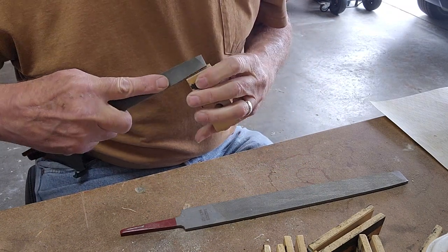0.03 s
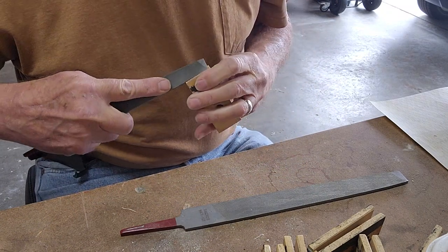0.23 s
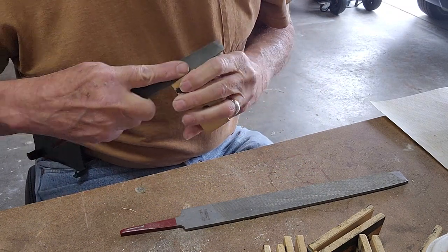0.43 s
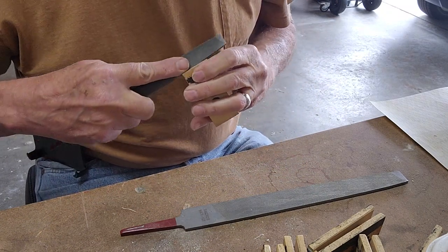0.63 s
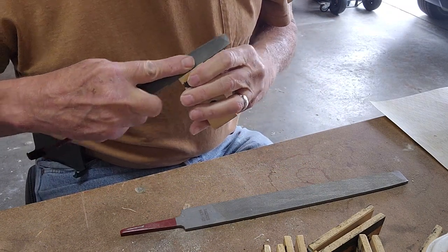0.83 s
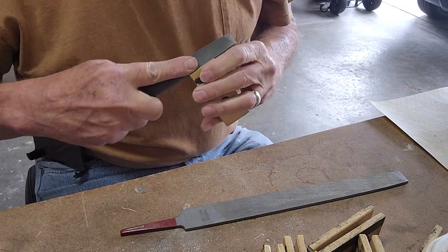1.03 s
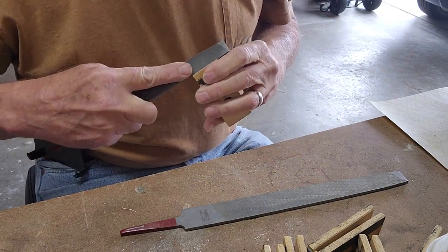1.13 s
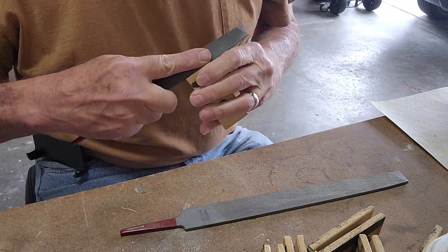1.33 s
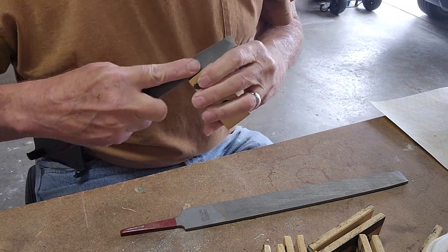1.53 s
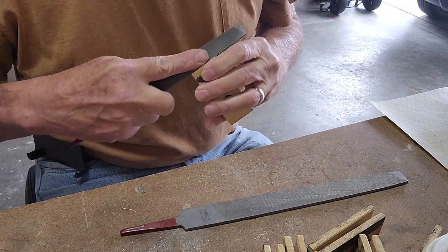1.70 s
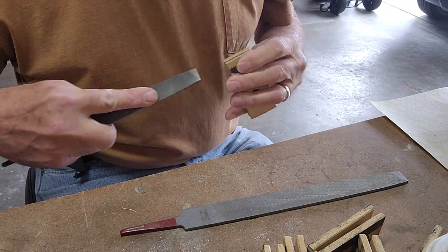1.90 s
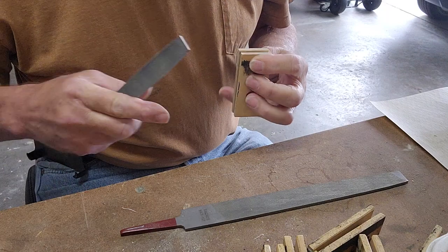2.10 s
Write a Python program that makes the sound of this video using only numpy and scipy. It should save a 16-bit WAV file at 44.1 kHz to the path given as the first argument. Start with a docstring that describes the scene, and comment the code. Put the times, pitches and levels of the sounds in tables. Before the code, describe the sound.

Close-miked hand filing on wood: a faint brush, then short gritty scrapes in steady rhythm, a brighter metallic final stroke, then a soft tap and quiet; low room rumble and slight workshop reflections, slightly left of centre.

```python
"""A flat steel file takes old glue off a small hand-held wooden block: a light touch, eight quick strokes, a faint brush.
Stroke speed drives level and tooth rate: fibres tear (random snaps), teeth tick, block and blade ring (resonances).
The blade rings hardest in the last full stroke. Pushes thud softly (low noise); damped noise bursts make taps.
Hands bump dully (short low cycles). Close, left of centre, in a workshop with low rumble and air (shaped noise)."""
import sys
import numpy as np
from scipy import signal
from scipy.fft import rfft, irfft
from scipy.io import wavfile
from scipy.ndimage import uniform_filter1d, map_coordinates

SR = 44100
rng = np.random.default_rng(int(sys.argv[2]) if len(sys.argv) > 2 else 0)


def inscribe(sig):
    """Save sig as 16-bit PCM at rate SR to the path in sys.argv[1].

    A 1-D sig is mono; a 2-D sig holds one channel per row.
    Samples are clipped to [-1, 1] before scaling.
    """
    pcm = np.round(np.clip(np.atleast_2d(sig).T, -1, 1) * 32767)
    wavfile.write(sys.argv[1], SR, pcm.astype(np.int16))


N = 95079

# Workshop rumble spectrum: (frequency [Hz], relative level per Hz [dB])
RUMBLE_SPECTRUM = [(24, -13), (33, -17), (44, -2.5), (55, 4), (70, -4.5), (100, -1.5), (125, -16.5),
                   (175, -15.5), (240, -39), (400, -66)]
# Workshop air noise spectrum: (frequency [Hz], relative level per Hz [dB])
AIR_SPECTRUM = [(100, -8), (260, -4), (390, 5.5), (600, -3.5), (1200, -7.5), (3000, -13.5), (7500, -15),
                (9500, -41), (15000, -24)]
# Dull bumps of the hands as the file turns round:
# (centre time [s], peak level [dB], frequency [Hz], half-length to 1/e [s])
HAND_BUMPS = [(0.227, -36, 60, 0.0074), (0.483, -39.5, 85, 0.016), (0.689, -34, 78, 0.014),
              (1.345, -31, 50, 0.021), (1.64, -35, 48, 0.044), (1.862, -35, 85, 0.016)]
# Taps of file and fingers on the block, band-passed twice:
# (start [s], peak level [dB], centre [Hz], width per pass [Hz], burst decay T60 [s])
BLOCK_TAPS = [(0.033, -47, 6760, 4170, 0.062), (0.052, -44.5, 1050, 575, 0.027),
              (0.055, -46, 3530, 2430, 0.029), (0.13, -45, 656, 910, 0.018), (0.13, -50, 2440, 3080, 0.028),
              (0.499, -62, 13300, 8000, .035), (0.915, -49.5, 1760, 2960, 0.034),
              (1.158, -42.5, 2300, 1380, 0.11), (1.345, -48, 1550, 480, 0.16),
              (1.506, -62, 2400, 2500, 0.041), (1.675, -48, 4840, 6060, 0.15),
              (1.688, -47.5, 1500, 440, .08), (1.825, -35.5, 2480, 1100, 0.054),
              (1.945, -50, 2750, 590, 0.026), (1.949, -51.5, 5560, 2930, 0.026)]
# Tearing fibres: (frequency [Hz], relative level per Hz [dB])
FIBRE_SPECTRUM = [(200, -34), (450, -15), (1100, -15), (2000, 3), (2400, -10), (2850, -9.5), (3300, -10.5),
                  (4300, -4.5), (6000, 6.5), (6700, -7), (7600, 7), (8650, -16.5), (9300, -12),
                  (11000, -14), (12200, -5), (14300, -7.5), (15400, -10)]
# Teeth meeting the edge: (frequency [Hz], relative level per Hz [dB])
TOOTH_SPECTRUM = [(200, -25), (400, 9.5), (530, 9.5), (800, -2.5), (1100, 2.5), (1600, -3.5), (2500, 8),
                  (4000, -10.5), (9000, -34)]
# Push thud: (frequency [Hz], relative level per Hz [dB])
THUD_SPECTRUM = [(30, -58), (60, 8.5), (78, -0.5), (88, 13.5), (105, -3.5), (135, -8.5), (180, -23),
                 (260, -56)]
# Block resonances: (frequency [Hz], width [Hz], mean relative level per Hz [dB])
BLOCK_MODES = [(1076, 134, -6), (1557, 103, -3), (2267, 160, -5), (2506, 75, -3.5), (3189, 160, 3.5),
               (3708, 110, 9), (4302, 145, 6.5), (4600, 390, -7.5), (6980, 150, -3)]
# Blade resonances: (frequency [Hz], width [Hz], mean relative level per Hz [dB])
BLADE_MODES = [(3660, 71, -18), (3850, 130, -10), (4736, 420, 2.5), (4887, 93, 4.5), (5010, 790, -5.5),
               (6120, 125, -3), (6260, 240, -20.5)]
# File strokes: (start [s], length [s], place of top speed [fraction, clipped to 0.1-0.9], swell exponent,
# rasp level [dB], rasp bass gain [dB], rasp treble gain [dB], block ring level [dB], blade ring level [dB],
# tooth tick level [dB], nominal top tooth rate [Hz], thud level [dB], edge resonance [Hz], edge ring level [dB])
FILE_STROKES = [ (0.225, 0.087, 0.79, 1.74, -63, 0, 2, -68, -70, -68.5, 411.3, -59, 2320, -77),
                (0.299, 0.2, 0.63, 1.44, -51, 9.5, 4, -48.5, -58, -57.5, 881, -64, 3220, -57.5),
                (0.548, 0.19, 0.64, 1.55, -54.5, 16, 5.5, -49, -54, -68, 784, -48, 4510, -51),
                (0.752, 0.15, 0.63, 1.35, -47.5, 9.5, 6, -45, -48, -61.5, 598, -45, 2474, -52),
                (0.95, 0.17, 0.57, 2.1, -51, 12, 3, -46.5, -51.5, -68.5, 550, -49.5, 3500, -69),
                (1.143, 0.16, 0.54, 1.17, -53, 15, 13.5, -47, -80, -60, 738, -41.5, 2380, -60.5),
                (1.326, 0.15, .46, 1.6, -46, 8.5, 2, -48.5, -40, -60, 1090, -42.5, 5800, -65),
                (1.488, 0.14, 0.53, 1.08, -48.5, 11.5, 4.5, -55, -84, -53.5, 519, -41, 3525, -52.5),
                (1.656, 0.22, 0.58, 1.54, -40.5, -8.5, 1, -44, -34, -62, 818, -41.5, 4180, -42.5),
                (2.014, 0.069, 1, 1.5, -75, -3, 4, -107, -100, -106, 390, -75, 7300, -72.5)]
# Ear level difference: (frequency [Hz], left minus right [dB])
EAR_LEVEL = [(700, 5.5), (2400, 1), (4400, -1), (6300, 1), (8100, 5), (10000, 10), (12200, 4.5),
             (14500, 10)]
# Ear phase difference: (frequency [Hz], left lead over right [rad])
EAR_PHASE = [(100, 0.033), (1640, 0.93), (3500, 1.38), (4100, 2.6), (4820, 4.92), (5430, 1.4), (6290, 5.1),
             (8100, 4.11), (11100, 7), (14300, 8.4)]
# Reflection from the blade ends: (frequency [Hz], share reflected [0-1])
BLADE_END_REFLECTION = [(1200, 0), (2600, 1)]

RUMBLE_DB, RUMBLE_SIDE_DB = -47, -19.5  # side relative to mid
AIR_DB, AIR_SIDE_DB = -70, -4
AROUND_LEFT_DB = 1.54  # left minus right
GRAINS_PER_S, GRAIN_SPREAD_DB = 9000, 2.5
CATCH_DB, CATCH_PER_S = 1.38, 43  # uneven bite
MODE_WANDER_MAX_DB, BLADE_WANDER_MAX_DB, MODE_WANDER_PER_S = 5, 2.5, 40
TOOTH_JITTER, TOOTH_JITTER_PER_S, TOOTH_DEPTH = .018, 330, 0.38
TOOTH_SPEED_POWER, BLADE_POWER, THUD_POWER = .65, 2.2, 0.4
EDGE_Q, SPREAD_DB = 16, -7
CONTACT_DB, CONTACT_T60_S = -4, .012
NEAR_DB, NEAR_T60_S = -1.5, 0.03
ROOM_DB, ROOM_T60_S, ROOM_TOP_HZ = -12.5, 0.25, 8500
BOUNCE_S, BOUNCE_DB = .001225, -10
BOUNCE_DRIFT, BOUNCE_DRIFT_PER_S = .035, 6  # rms fraction of the delay
LOW_CUT_HZ, TOP_HZ, FADE_S = 24, 15400, .006


def undb(db):
    """Decibels to gain."""
    return 10 ** (np.asarray(db) / 20)


def unit(x):
    """Scale to rms 1."""
    return x / np.sqrt(np.mean(x ** 2) + 1e-18)


def noise():
    """White noise."""
    return rng.standard_normal(N)


def walk(rate_per_s):
    """Smoothed noise at rms 1."""
    k = max(int(SR / rate_per_s), 1)
    return unit(uniform_filter1d(uniform_filter1d(noise(), k), k))


def freqs():
    """Bin frequencies [Hz], floored at 1."""
    return np.maximum(np.fft.rfftfreq(N, 1 / SR), 1)


def over_hz(points):
    """Interpolate (Hz, value) points over log frequency."""
    hz, value = np.array(points, float).T
    return np.interp(np.log(freqs()), np.log(np.maximum(hz, 1)), value)


def weigh(x, response):
    """Multiply the spectrum of x by a response."""
    return irfft(rfft(x) * response, N)


def colour(x, points):
    """Apply a (Hz, dB) response, at rms 1."""
    return unit(weigh(x, undb(over_hz(points))))


def ring(x, modes):
    """Parallel (Hz, width Hz, dB) resonances, at rms 1."""
    f = freqs()
    response = sum(undb(db) / (1 + 1j * (f / hz - hz / f) * hz / width) for hz, width, db in modes)
    return unit(weigh(x, response))


def split_ears(left_minus_right_db):
    """Left and right gains, half the difference each."""
    return undb(np.array([[.5], [-.5]]) * left_minus_right_db)


def background(points, db, side_db):
    """Steady workshop noise: shared mid plus opposite-sign side for width."""
    mid = colour(noise(), points)
    side = undb(side_db) * colour(noise(), points) * np.array([[1], [-1]])
    return undb(db) * (mid + side)


def echoes(x, t, t60_s):
    """Diffuse reflections: decaying noise tail, independent per ear."""
    tail = rng.standard_normal((2, SR // 2)) * np.exp(-np.log(1000) * t[:SR // 2] / t60_s)
    tail /= np.sqrt(np.sum(tail ** 2, axis=1, keepdims=True))
    return signal.fftconvolve(x[None], tail, axes=1)[:, :N]


def place(x, scattered, t):
    """Direct sound left of centre, quick reflections off hands and bench, then the duller workshop."""
    lead_rad = np.interp(freqs(), *np.array(EAR_PHASE).T)
    direct = np.array([x, weigh(x, np.exp(-1j * lead_rad))])
    near = direct + scattered + undb(NEAR_DB) * echoes(x, t, NEAR_T60_S)
    near = weigh(near, split_ears(over_hz(EAR_LEVEL)))
    dull = weigh(x, 1 / np.sqrt(1 + (freqs() / ROOM_TOP_HZ) ** 4))
    return near + undb(ROOM_DB) * echoes(dull, t, ROOM_T60_S)


def bounce(x, t):
    """Reflection from the blade ends: a drifting delay cuts shifting notches, mostly in the treble."""
    late_s = t - BOUNCE_S * (1 + BOUNCE_DRIFT * walk(BOUNCE_DRIFT_PER_S))
    reflected = weigh(x, over_hz(BLADE_END_REFLECTION))
    copy = np.array([map_coordinates(row, [late_s * SR], order=3) for row in reflected])
    return (x + undb(BOUNCE_DB) * copy) / np.sqrt(1 + undb(2 * BOUNCE_DB))


def bumps(t):
    """Hand bumps: low cosines of random phase in Gaussian swells."""
    out = np.zeros(N)
    for at, db, hz, half_s in HAND_BUMPS:
        swell = np.exp(-((t - at) / half_s) ** 2)
        out += undb(db) * swell * np.cos(2 * np.pi * (hz * t + rng.random()))
    return out


def taps(t):
    """Knocks: decaying noise bursts through a doubled resonance."""
    out = np.zeros(N)
    for start, db, hz, width, t60_s in BLOCK_TAPS:
        burst = noise() * (t >= start) * np.exp(-np.log(1000) * np.maximum(t - start, 0) / t60_s)
        knock = ring(ring(burst, [(hz, width, 0)]), [(hz, width, 0)])
        out += undb(db) * knock / np.abs(knock).max()
    return out


def fibres():
    """Fibre snaps: random impulses of either sign and unequal size."""
    hits = rng.random(N) < GRAINS_PER_S / SR
    return unit(hits * np.sign(noise()) * undb(GRAIN_SPREAD_DB * noise()))


def restless(modes, wander_max_db):
    """Snaps excite body modes, each level wandering as the contact point moves."""
    out = np.zeros(N)
    for hz, width, db in modes:
        level = undb(db + wander_max_db * np.tanh(walk(MODE_WANDER_PER_S)))
        ringing = ring(ring(fibres(), [(hz, 4 * width, 0)]), [(hz, width, 0)])
        out += level * np.sqrt(width) * ringing
    return unit(out)


def stroke_speed(t, start, length, top):
    """Relative speed: a skewed half-sine, zero outside the stroke."""
    peak = start + length * np.clip(top, .1, .9)
    progress = np.interp(t, [start, peak, start + length], [0, .5, 1])
    return np.abs(np.sin(np.pi * progress))


def tooth_ticks(turns, catch, length):
    """One impulse per tooth passing the edge, coloured; level set over the stroke length."""
    ticks = np.diff(np.floor(turns), prepend=0) * catch
    return colour(ticks, TOOTH_SPECTRUM) * np.sqrt(length * SR / N)


def filing(t):
    """Stroke speed sets loudness and tooth rate; returns scrape, its stereo scatter, and thuds."""
    rasp = colour(fibres(), FIBRE_SPECTRUM)
    block, blade = restless(BLOCK_MODES, MODE_WANDER_MAX_DB), restless(BLADE_MODES, BLADE_WANDER_MAX_DB)
    bass = weigh(rasp, over_hz([(700, 1), (1400, 0.1)]))
    treble = weigh(rasp, over_hz([(7500, 0.19), (9500, 1)]))
    # snaps along the blade favour one ear
    spread = undb(SPREAD_DB) * np.array([colour(fibres(), FIBRE_SPECTRUM) for ear in range(2)])
    thud = colour(noise(), THUD_SPECTRUM)
    catch = undb(CATCH_DB * walk(CATCH_PER_S))
    uneven = 1 + TOOTH_JITTER * walk(TOOTH_JITTER_PER_S)
    snaps = fibres()
    scrape, scattered, thuds = np.zeros(N), np.zeros((2, N)), np.zeros(N)
    for (start, length, top, steep, rasp_db, bass_db, treble_db, block_db, blade_db,
         tooth_db, tooth_hz, thud_db, edge_hz, edge_db) in FILE_STROKES:
        speed = stroke_speed(t, start, length, top)
        force = speed ** steep
        turns = np.cumsum(tooth_hz * speed ** TOOTH_SPEED_POWER * uneven) / SR  # teeth passed
        teeth = undb(tooth_db) * tooth_ticks(turns, catch, length)
        buzz = 1 + TOOTH_DEPTH * np.cos(2 * np.pi * turns)
        bite = undb(rasp_db) * force * catch * buzz
        tearing = bite * (rasp + (undb(bass_db) - 1) * bass + (undb(treble_db) - 1) * treble)
        edge = undb(edge_db) * ring(snaps, [(edge_hz, edge_hz / EDGE_Q, 0)])
        wood = undb(block_db) * block + edge
        steel = force ** BLADE_POWER * undb(blade_db) * blade
        scrape += tearing + force * (catch * wood + teeth) + steel
        scattered += bite * spread + undb(CONTACT_DB) * echoes(tearing, t, CONTACT_T60_S)
        thuds += force ** THUD_POWER * undb(thud_db) * thud
    return scrape, scattered, thuds


def scene():
    """Filing and taps over bumps, rumble and air."""
    t = np.arange(N) / SR
    scrape, scattered, thuds = filing(t)
    low = thuds + bumps(t) + background(RUMBLE_SPECTRUM, RUMBLE_DB, RUMBLE_SIDE_DB)
    air = background(AIR_SPECTRUM, AIR_DB, AIR_SIDE_DB)
    around = (low + air) * split_ears(AROUND_LEFT_DB)
    return bounce(place(scrape + taps(t), scattered, t), t) + around


def record(dry):
    """Cut the deepest bass, fade the ends, low-pass steeply."""
    t = np.arange(N) / SR
    sound = weigh(dry, 1 / np.sqrt(1 + (LOW_CUT_HZ / freqs()) ** 8))
    sound = sound * np.minimum(np.minimum(t, t[-1] - t) / FADE_S, 1)
    return signal.sosfilt(signal.ellip(10, .2, 80, TOP_HZ, fs=SR, output="sos"), sound)


dry = scene()
out = record(dry)
inscribe(out)
```